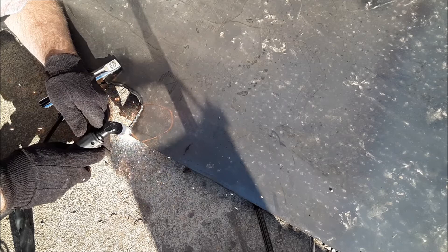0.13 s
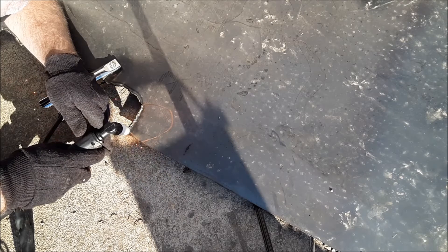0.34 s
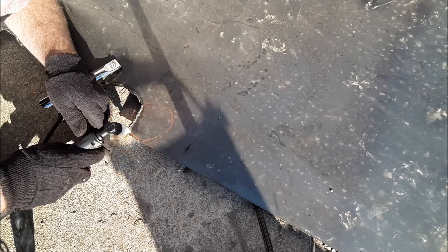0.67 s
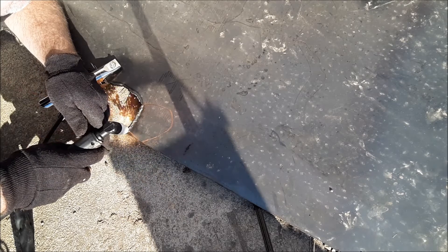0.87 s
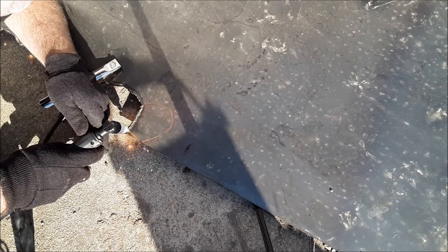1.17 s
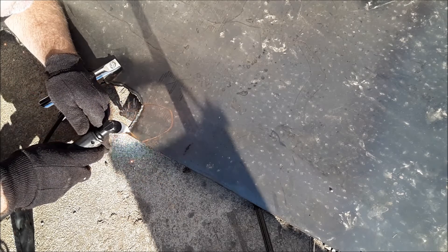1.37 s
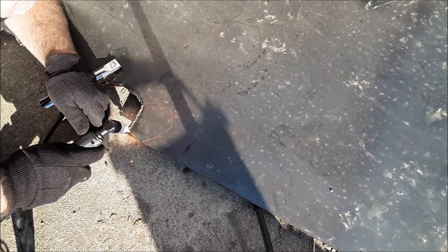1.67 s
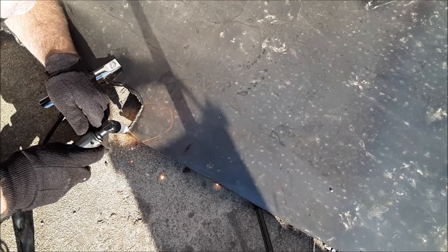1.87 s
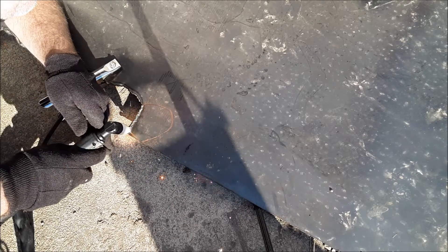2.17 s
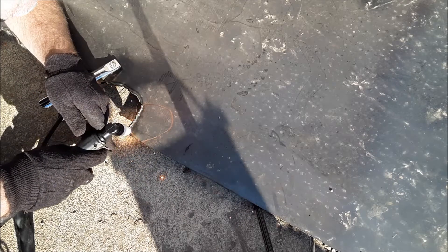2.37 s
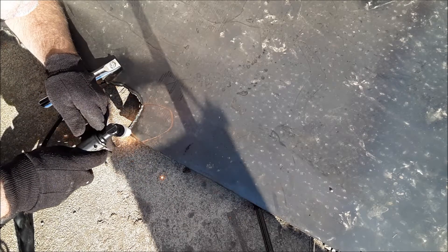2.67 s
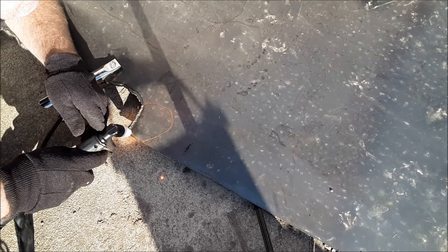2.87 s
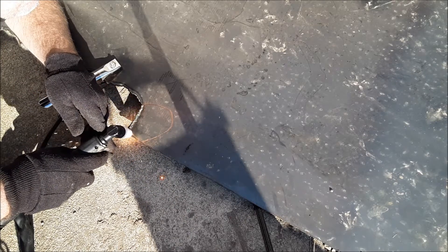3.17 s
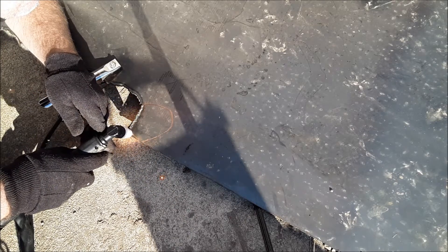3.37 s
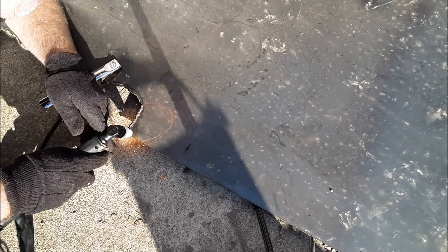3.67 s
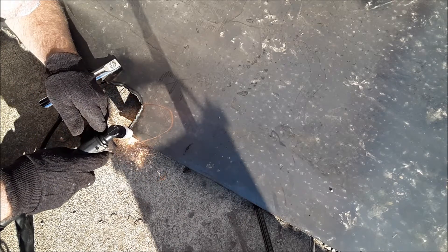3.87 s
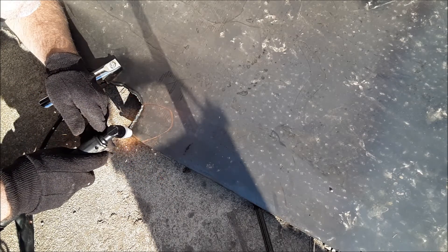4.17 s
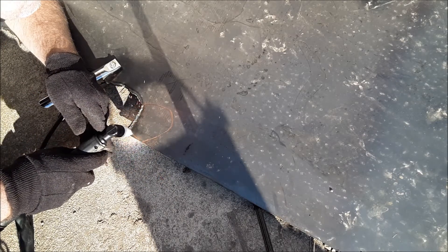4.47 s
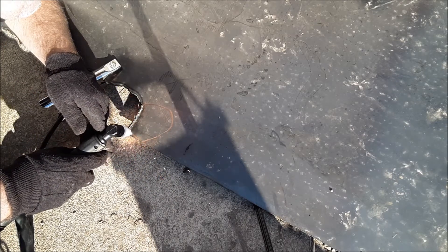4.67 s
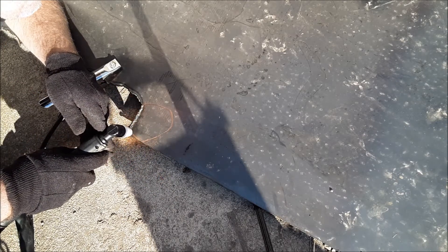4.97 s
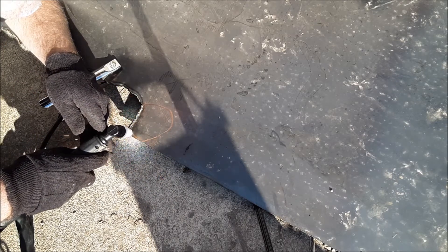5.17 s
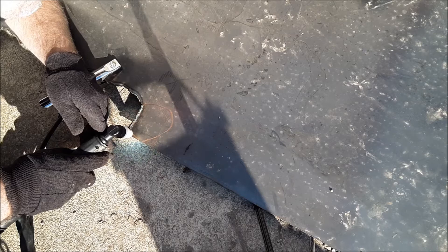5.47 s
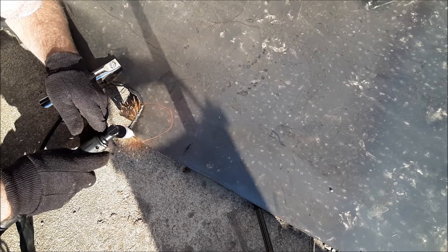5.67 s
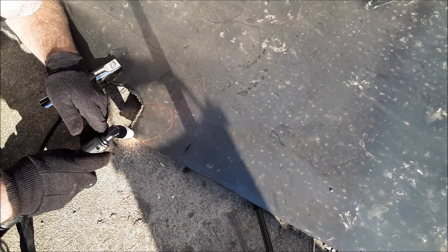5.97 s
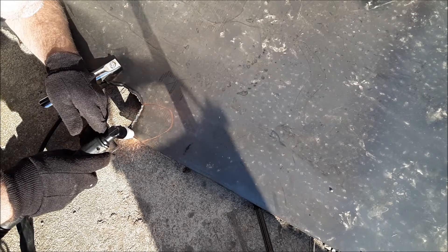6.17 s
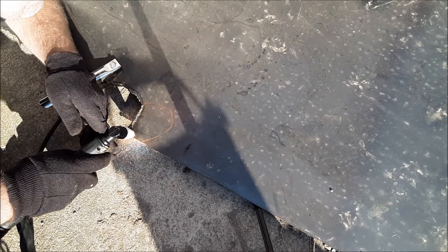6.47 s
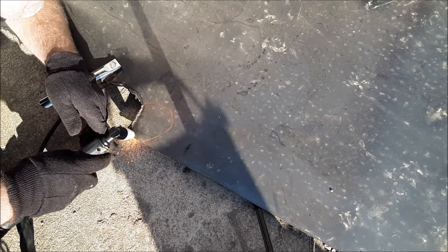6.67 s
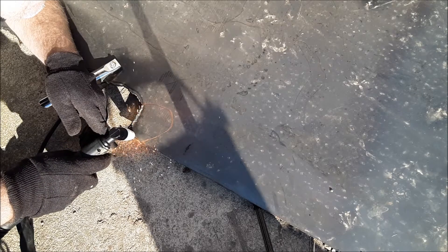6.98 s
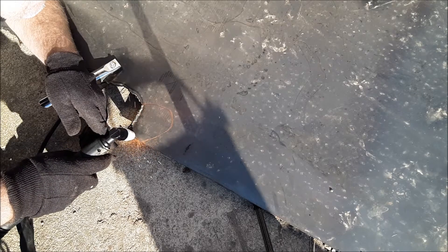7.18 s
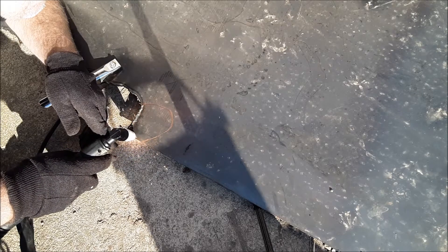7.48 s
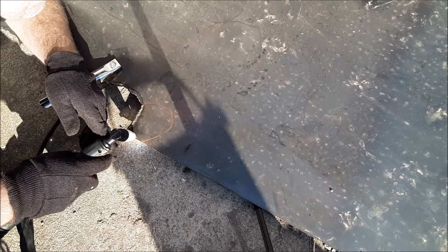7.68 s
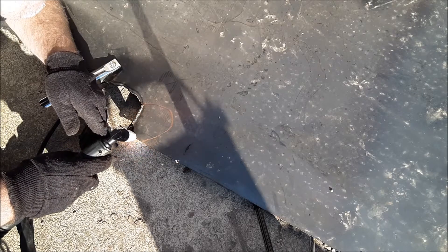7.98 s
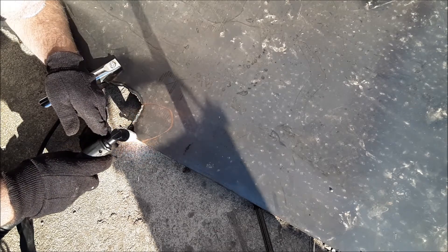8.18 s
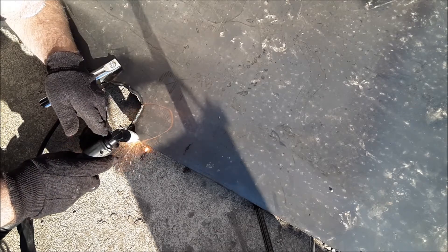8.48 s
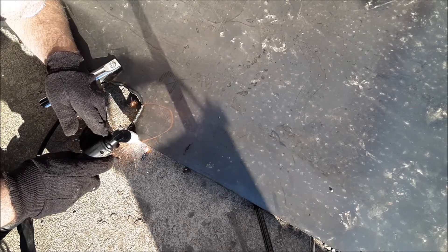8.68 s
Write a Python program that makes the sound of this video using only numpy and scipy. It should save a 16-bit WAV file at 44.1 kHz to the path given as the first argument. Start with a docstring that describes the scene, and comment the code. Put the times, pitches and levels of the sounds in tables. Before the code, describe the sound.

Close, bright hiss of compressed air with a crackling plasma arc that repeatedly snaps out and catches again, above a faint low rumble.

```python
"""A hand-held plasma torch cuts sheet steel outdoors, close to a small stereo camera.
The arc is four coloured noises: spit, sizzle, blast and roar. It pops when it breaks and flutters when it strikes
again, both made of short pressure pulses. Compressed air, a bright noise, hisses all the time.
Scattered sound and one faint short echo follow; the left microphone is nearer.
A low rumble and a light breeze, both soft noises, lie underneath."""
import sys
import numpy as np
from scipy import signal
from scipy.fft import rfft, irfft, next_fast_len
from scipy.io import wavfile
from scipy.ndimage import uniform_filter1d, map_coordinates

SR = 44100
rng = np.random.default_rng(int(sys.argv[2]) if len(sys.argv) > 2 else 0)


def waveform_to_disk(signal):
    """Save audio, clipped to [-1, 1], as 16-bit WAV at the path in sys.argv[1]."""
    frames = np.transpose(np.atleast_2d(signal))
    scaled = np.clip(frames, -1, 1) * 32767
    samples = np.round(scaled).astype(np.int16)
    wavfile.write(sys.argv[1], SR, samples)


N = 389403  # length in samples


def amp(db):
    """Turn decibels into a plain multiplier."""
    return 10 ** (np.asarray(db) / 20)


def unit(x):
    """Scale a signal to an average strength (rms) of 1."""
    return x / np.sqrt(np.mean(x ** 2) + 1e-20)


def seconds():
    """The time of every sample."""
    return np.arange(N) / SR


def along(points, hz):
    """Read a curve of (pitch_hz, value) points, spaced by ratio of pitch."""
    f, v = np.transpose(points)
    return np.interp(np.log(hz + 1), np.log(f + 1), v)


def filtered(x, response):
    """Change the strength and timing of each pitch in a sound."""
    m = next_fast_len(N + 8192)  # spare room so that tails do not wrap round
    hz = np.fft.rfftfreq(m, 1 / SR)
    return irfft(rfft(x, m) * response(hz), m)[..., :N]


def lifted(bands, hz):
    """Bell-shaped lifts and dips: (pitch_hz, width_hz, lift_db)."""
    return amp(sum(db * np.exp(-.5 * ((hz - centre) / width) ** 2) for centre, width, db in bands))


def wobble(rate):
    """A smooth random curve through `rate` random points a second."""
    knots = rng.standard_normal(int(N * rate / SR) + 4)
    return map_coordinates(knots, [np.arange(N) * rate / SR])


def turbulence(spectrum, patchy_db, gritty_db):
    """Rough flow: coloured noise with random patches in time and pitch, and a fast crackle."""
    z = signal.stft(rng.standard_normal(N), nperseg=512)[2]
    patches = uniform_filter1d(rng.standard_normal(z.shape), 7, 0)  # smooth over pitch
    patches = unit(uniform_filter1d(patches, 12, 1))  # smooth over time
    noise = signal.istft(z * amp(patchy_db * patches), nperseg=512)[1][:N]
    crackling = noise * amp(gritty_db * wobble(900))
    return unit(filtered(crackling, lambda hz: amp(along(spectrum, hz))))


def pulses(times, sizes, width_s):
    """Bell-shaped pressure pulses."""
    kicks = np.bincount(np.round(times * SR).astype(int), sizes, N)
    t = np.arange(-60, 61) / SR
    return np.convolve(kicks, np.exp(-.5 * (t / width_s) ** 2), "same")


# sudden changes of the arc: start_s, level_db (peak at the torch),
# direction (-1 inward as the arc collapses, 1 outward)
POP_EVENTS = [(.0422, -29, 1), (.2156, -22, -1), (.5146, -22, -1), (.8981, -18, -1), (1.198, -17, -1),
              (1.7808, -13, -1), (1.9562, -34, 1), (1.9676, -23, 1), (2.2, -27, 1), (3.5893, -20, -1),
              (4.2051, -15, -1), (4.3998, -33, 1), (4.4069, -30, 1), (4.8053, -17, -1), (5.169, -20, 1),
              (5.2461, -16, -1)]
# the arc strikes; each burn lasts until the next inward pop: start_s, catch_s (time to catch fully)
ARC_STRIKES = [(0.041, 0.0016), (0.393, 0.0036), (0.677, 0.014), (1.065, 0.01), (1.371, 0.02),
               (1.952, 0.012), (3.835, 0.023), (4.395, 0.0087), (5.163, 0.0045), (5.42, 0.063)]
# the burning arc: start_s, strength_db, lows_db (swing of the lower noises)
ARC_STRENGTH = [(.04, -36.5, -8.5), (.21, -39.5, 1.5), (.4, -37, -3), (.51, -37, -2), (.7, -36.5, 0),
                (.9, -35, 1.5), (1.4, -31, -1.5), (1.55, -32, 1), (1.72, -29.5, -5), (2.0, -32, -3.5),
                (2.17, -32.5, 4.5), (2.24, -33, 7.5), (2.28, -35.5, 0), (2.35, -38, 2), (2.45, -40.5, 3),
                (2.75, -47, 1.5), (3.1, -40, -2.5), (3.25, -46.5, 3), (3.45, -35, -1), (3.59, -33, 2.5),
                (3.85, -39.5, 3.5), (3.97, -34.5, 2), (4.2, -30.5, 1.5), (4.5, -31, 0), (4.8, -28.5, -1.5),
                (5.19, -32.5, 2), (5.25, -33, -1), (5.5, -38, 8), (5.69, -35.5, 5.5), (5.73, -33, -5),
                (5.82, -33.5, -4.5), (5.88, -34, 2), (6.1, -38, 1.5), (6.7, -33, -0.5), (7.05, -37, -4),
                (7.17, -34, -1), (7.6, -34, 1), (8.15, -34, -1), (8.4, -40, 3), (8.76, -30, -2.5),
                (8.83, -31.5, -0.5)]
# the arc falters without breaking: centre_s, depth_db (negative is a lift), half_length_s
ARC_FALTERS = [(2.09, 6.5, 0.016), (4.176, 1.5, 0.013), (4.418, 11, 0.011), (4.71, 6.5, 0.038),
               (6.34, -2, 0.016), (7.287, 10, 0.01), (7.44, -1, 0.035), (8.03, 9, 0.0049)]
# rows spit, sizzle, blast, roar: level_db (at middle strength), growth (dB per dB of strength),
# lows_share (share of lows_db), wander_db (own slow wander)
JET_NOISES = [(-34.5, 0.68, 0.12, 1), (-34.5, 0.73, 0, 0.08), (-42.5, 0.52, 0.62, 0), (-50, 0.9, 0.97, 2)]
# colours of the four noises: pitch_hz, relative_level_db
SPIT_COLOUR = [(150, -72), (400, -26.5), (9000, -37), (11000, -36), (12500, -2), (14000, -2), (15700, -3.5)]
SIZZLE_COLOUR = [(150, -58), (400, -19.5), (4500, -16), (6000, -5), (6500, -5.5), (8000, -6), (10000, 0.5),
                 (12000, -0.5), (14000, -41)]
BLAST_COLOUR = [(150, -63), (400, -21.5), (1200, -13), (1800, -2), (2500, -0.5), (3800, -2), (5500, -3),
                (7500, -72)]
ROAR_COLOUR = [(30, -58), (110, -34), (150, -2.5), (210, -3), (400, -2), (700, 1.5), (1100, 3.5),
               (1600, 0.5), (2400, -13.5), (4000, -53)]
MIDDLE_DB = -35  # the strength at which the four noises have their listed levels
FLARE_DB, FLARE_S = 0.5, 0.036  # the arc stretches and brightens just before it breaks
SURGE_DB, SURGE_S = 1.5, 0.03  # the current overshoots after a strike


def burning():
    """The arc's on-off gain: it catches at each strike and stops at the next break."""
    t = seconds()
    breaks = [at for at, db, direction in POP_EVENTS if direction < 0]
    on = np.zeros(N)
    for (strike, catch), end in zip(ARC_STRIKES, breaks + [np.inf]):  # the last burn does not break
        lit = (t >= strike) & (t < end)
        flare_db = FLARE_DB * np.exp(-np.abs(end - t) / FLARE_S)
        surge_db = SURGE_DB * np.exp(-np.abs(t - strike) / SURGE_S)
        on += lit * amp(flare_db + surge_db) * np.clip((t - strike) / catch, 0, 1)
    return on


def arc():
    """Four noises of the hot jet, switched on and off with the current."""
    t = seconds()
    s, strength_db, lows_db = np.transpose(ARC_STRENGTH)
    strength = np.interp(t, s, strength_db) - MIDDLE_DB
    lows = np.interp(t, s, lows_db)
    for at, depth_db, half in ARC_FALTERS:
        strength -= depth_db * np.exp(-.5 * ((t - at) / half) ** 2)
    levels_db = np.array([db + growth * strength + share * lows + wander_db * wobble(9)
                          for db, growth, share, wander_db in JET_NOISES])
    gains = uniform_filter1d(burning() * amp(levels_db), size=40)  # soften the switching
    sputter = 0.08 * wobble(18) + 0.55 * wobble(45)  # dB; molten steel leaves the cut unevenly
    spit, sizzle, blast, roar = gains * amp(sputter)
    return (spit * turbulence(SPIT_COLOUR, patchy_db=.8, gritty_db=1.3)
            + sizzle * turbulence(SIZZLE_COLOUR, patchy_db=.8, gritty_db=1.4)
            + blast * turbulence(BLAST_COLOUR, patchy_db=1.8, gritty_db=1.2)
            + roar * turbulence(ROAR_COLOUR, patchy_db=1.2, gritty_db=2.5))


def pops():
    """Each sudden change of the arc's volume is one short pressure pulse."""
    s, db, direction = np.transpose(POP_EVENTS)
    return pulses(s, direction * amp(db), width_s=.0001)


# the freshly struck arc jumps to and fro: start_s, length_s, rate_per_s (jumps),
# level_db (middle peak at the torch)
FLUTTER_TRAINS = [(0.042, 0.018, 680, -39.5), (0.395, 0.015, 440, -36.5), (0.686, 0.047, 460, -29.5),
                  (1.073, 0.036, 405, -30.5), (1.371, 0.017, 600, -28.5), (1.96, 0.014, 520, -30.5),
                  (3.837, 0.015, 570, -40.5), (5.159, 0.018, 500, -36)]
SNAP_SHARE, SNAP_DB = .3, -4.5  # share of jumps that snap sharply; snap level against its jump


def flutter():
    """Uneven trains of softer pulses that swell in over the first jumps; some of them snap."""
    out = np.zeros(N)
    for start, length, rate, db in FLUTTER_TRAINS:
        gap_chance, size_chance = rng.standard_normal((2, 40))
        snaps = rng.random(40) < SNAP_SHARE
        times = np.cumsum(np.abs(1 + 0.21 * gap_chance)) / rate
        swell = np.clip(times / 0.0086, 0, 1)
        sizes = -swell * (times < length) * amp(db + 2.9 * size_chance)
        out += pulses(start + times, sizes, width_s=0.00017)
        out += pulses(start + times, snaps * amp(SNAP_DB) * sizes, width_s=0.00007)
    return out


# air flow from the nozzle: start_s, level_db (at the torch, before a slight wobble)
AIR_FLOW = [(0, -41), (.3, -42.5), (.6, -41.5), (1, -37.5), (1.3, -39), (1.87, -38.5), (3.7, -38),
            (4.3, -35.5), (5, -37), (5.33, -37), (8.83, -37.5)]
# colour of the hiss: pitch_hz, relative_level_db
HISS_COLOUR = [(100, -70), (400, -37), (1000, -9.5), (1500, -4), (2000, 1.5), (3000, 1.5), (4000, 4),
               (5500, 6), (9000, 3), (10000, 7.5), (11500, 7.5), (13000, 6.5), (15700, 6.5)]


def air():
    """The cold jet is a bright hiss that keeps blowing between burns."""
    level_db = np.interp(seconds(), *np.transpose(AIR_FLOW)) + .6 * wobble(20)
    return amp(level_db) * turbulence(HISS_COLOUR, patchy_db=.8, gritty_db=.8)


# sound bends round the camera body, so the right side's lag depends on pitch: pitch_hz, lag_us (microseconds)
RIGHT_LAG = [(700, 117), (1050, 108), (1400, 132), (2050, 120), (2750, 141), (4800, 144), (5900, 138),
             (6900, 127), (8300, 119), (9600, 134), (15000, 135)]


def two_sides(torch):
    """Sound reaches the right microphone a little later than the left."""
    def lag(hz):
        cycles = hz * along(RIGHT_LAG, hz) / 1e6
        return np.exp(-2j * np.pi * np.outer([0, 1], cycles))
    return filtered(torch, lag)


# scattered sound: pitch_hz, level_db (against the direct sound), t60_s (time to fade by 60 dB)
SCATTERED = [(100, -8, .08), (600, -6.5, .08), (1500, -4.5, .06), (3000, -3, .03), (6000, -.5, .015),
             (9000, -2.5, .015), (15000, -2.5, .015)]


def surroundings(x):
    """Scattered sound: fresh noise on each side follows the torch's fading power at each pitch."""
    hz, t, z = signal.stft(x, SR, nperseg=128)
    table = np.array(SCATTERED)
    level_db = along(table[:, [0, 1]], hz)[:, None]
    t60 = along(table[:, [0, 2]], hz)[:, None]
    decay = amp(-60 * np.arange(40) * t[1] / np.abs(t60))
    decay = amp(level_db) * decay / np.linalg.norm(decay, axis=1, keepdims=True)
    power = np.abs(signal.fftconvolve(np.abs(z) ** 2, decay ** 2, axes=1)[:, :len(t)])
    power = uniform_filter1d(power, size=3, axis=1, origin=1)
    # fresh noise, as the flickering jet never takes the same paths twice
    noise = signal.stft(rng.standard_normal((2, N)), SR, nperseg=128)[2]
    noise /= np.sqrt(np.mean(np.abs(noise) ** 2))
    wet = signal.istft(np.sqrt(power) * noise, SR, nperseg=128)[1][:, :N]
    return filtered(wet, lambda hz: hz ** 3 / (hz ** 3 + 170 ** 3))  # keep deep bass out of the scattered sound


# reflections from hand, clamp and sheet as the torch travels: start_s, end_s, left bands, right bands;
# each band: pitch_hz, width_hz, lift_db
TORCH_PLACES = [(0, .9, [(4000, 250, 3.5), (4700, 400, -2), (5850, 200, -3.5), (6900, 450, 2.5),
                (7900, 300, 1.5), (9200, 350, 4), (10800, 600, -3), (12700, 600, 2.5), (13900, 200, -3),
                (15400, 350, 3)], [(3800, 400, 2.5), (4900, 600, -3), (7600, 300, 1.5), (8900, 250, 3),
                (10400, 700, -4), (12500, 500, 3.5), (15300, 400, 4.5)]), (1.4, 2.1, [(3900, 400, 4),
                (5850, 220, -4.5), (6600, 300, 4), (7900, 300, 4), (9700, 500, 3), (11300, 400, -4.5),
                (12500, 400, 2), (13450, 200, 5), (14100, 300, 2.5), (15350, 350, 5.5)], [(3800, 600, 3.5),
                (5700, 350, -3.5), (6500, 400, 2), (8000, 400, 5), (9900, 500, 2), (11200, 400, -4),
                (12500, 250, 2.5), (13400, 200, 4.5), (15250, 350, 6)]), (2.5, 3.4, [(4000, 300, 3.5),
                (5700, 350, -2), (6900, 450, 3.5), (7900, 300, 3), (9600, 400, 3.5), (12600, 450, 5),
                (14200, 500, -1.5), (15400, 350, 2.5)], [(4000, 600, 2.5), (5300, 600, -2.5),
                (8200, 500, 3), (9500, 300, 1.5), (12600, 400, 4.5), (15200, 400, 2.5)]),
                (3.9, 4.8, [(3700, 500, 3.5), (5600, 250, -2.5), (8700, 250, 4.5), (10000, 300, 1.5),
                (10700, 300, -2), (11650, 200, -2.5), (12550, 300, 3.5), (14100, 250, 2.5),
                (15400, 300, 3.5)], [(3600, 450, 3.5), (5300, 450, -2), (8400, 400, 4.5),
                (10300, 700, -1.5), (12300, 400, 3), (14100, 400, 1), (15400, 300, 3.5)]),
                (5, 5.3, [(3800, 400, 2.5), (5500, 250, -1.5), (7100, 450, 3), (8900, 300, 1.5),
                (11100, 300, -2.5), (12900, 500, 3), (15300, 400, 3)], [(3800, 500, 2.5), (5200, 500, -1.5),
                (7900, 400, 3), (10500, 600, -1.5), (12500, 600, 2.5), (15000, 600, 2.5)]),
                (5.5, 5.7, [(3600, 400, 2), (7300, 400, 2.5), (8500, 300, 1.5), (10100, 200, 1),
                (11100, 150, 3), (12300, 250, 4), (13300, 200, 1), (14700, 300, -2), (15500, 200, 4)],
                [(3500, 400, 2.5), (8300, 400, 3), (10700, 200, 1), (12150, 250, 4.5), (14000, 300, 2),
                (15400, 300, 2)]), (5.95, 6.4, [(3600, 400, 2), (7700, 500, 2.5), (9200, 200, -3),
                (10100, 200, 2), (11200, 300, -2), (11950, 200, 3.5), (13300, 150, 4), (14150, 150, 2),
                (14900, 200, 4), (15500, 150, 3)], [(3500, 400, 2.5), (8200, 350, 4), (9000, 200, -2),
                (10100, 200, 1.5), (11850, 250, 4.5), (13100, 250, 3), (14000, 200, 1.5),
                (14900, 400, 2.5)]), (6.8, 7.5, [(3600, 400, 2), (5700, 300, -1.5), (7300, 300, 2.5),
                (8600, 170, 3.5), (10150, 200, 2.5), (11200, 300, -2.5), (11900, 200, 3.5),
                (12700, 200, -1), (13350, 150, 5), (14150, 150, 3), (15100, 350, -.5)], [(3500, 400, 2.5),
                (8200, 450, 4), (9100, 200, -2), (10000, 250, 1.5), (11200, 250, -2), (11900, 300, 4),
                (13250, 200, 3), (14100, 250, 2), (15300, 400, .5)]), (7.8, 8.3, [(3000, 200, 1.5),
                (5700, 300, -2.5), (7100, 400, 2), (8200, 350, 4.5), (9900, 250, 2.5), (10700, 300, -2),
                (11600, 300, 3.5), (12400, 200, -2.5), (13300, 200, 2.5), (14200, 250, 2.5),
                (15200, 300, -2)], [(3300, 300, 2), (5900, 300, -2), (8000, 400, 5.5), (8800, 250, -2),
                (9800, 250, 2.5), (10500, 200, -3), (11500, 400, 4), (13200, 200, 2), (14000, 300, 2),
                (15000, 300, -2)]), (8.55, 8.83, [(5700, 300, -2.5), (7900, 400, 2), (9100, 200, 4),
                (9800, 200, 1), (11300, 250, 3.5), (13600, 250, 4), (15500, 200, 2.5)], [(5700, 300, -2.5),
                (8000, 400, 3), (9500, 250, 2.5), (10900, 350, 3.5), (12200, 250, 2), (13800, 400, 2.5),
                (15400, 300, 2)])]
# lifts and dips that stay put, left list then right list: pitch_hz, width_hz, lift_db
STEADY_BANDS = [
    [(234, 50, 4), (407, 33, 4.5), (580, 99, 3.5), (742, 33, -5.5), (855, 40, 2.5), (960, 50, 3),
     (1150, 110, -2.5), (1394, 27, 4.5), (1600, 42, -4), (1880, 100, 3.5), (2350, 99, -4), (2780, 44, 2.5),
     (2700, 22, 0.5), (3000, 24, -6), (3070, 63, 6), (3220, 45, -6), (3840, 40, -7), (4000, 58, 2),
     (4170, 60, -7.5), (4180, 38, 1.5), (4300, 77, 2)],
    [(230, 50, 2), (405, 33, 3), (590, 140, 2), (806, 30, -6.5), (980, 80, 2), (1117, 35, -10.5),
     (1385, 16, 2.5), (1710, 40, 1.5), (1790, 25, -9.5), (1940, 80, 3), (2360, 150, -2), (3080, 40, 5.5),
     (3200, 40, 0.5), (3430, 80, 1), (3440, 33, -6), (4150, 54, 1), (4150, 50, -5.5), (4500, 78, 2),
     (4520, 59, 2)],
]
# one faint short echo, mostly on the right: delay_ms, left_db, right_db (against the sound before the echo)
FAINT_ECHO = (3.02, -34, -22)


def paths(pair):
    """Reflections colour the sound, drifting as the torch travels; one faint short echo is added."""
    times = np.ravel([place[:2] for place in TORCH_PLACES])
    drifting = np.zeros((2, N))
    for share, (start, end, left, right) in zip(np.eye(len(TORCH_PLACES)), TORCH_PLACES):
        fade = np.interp(seconds(), times, np.repeat(share, 2))  # full at this place, fading to its neighbours
        drifting += fade * filtered(pair, lambda hz: np.array([lifted(left, hz), lifted(right, hz)]))
    delay_ms, *echo_db = FAINT_ECHO

    def steady(hz):
        echo = 1 + np.outer(amp(echo_db), np.exp(-2j * np.pi * hz * delay_ms / 1000))
        return echo * [lifted(side, hz) for side in STEADY_BANDS]
    return filtered(drifting, steady)


# colour of the rumble: pitch_hz, relative_level_db
RUMBLE_COLOUR = [(30, -45), (140, -14), (210, -0.5), (300, 4), (450, -2.5), (800, -8), (1500, -27),
                 (3000, -16)]
# the rumble grows at first: start_s, change_db
RUMBLE_SWELL = [(0, -3.5), (2, -1), (3.6, 0), (8.83, -1)]


def yard():
    """A low rumble, probably the compressor: noise partly shared by both sides."""
    shared = turbulence(RUMBLE_COLOUR, patchy_db=2.5, gritty_db=4.0)
    own = np.array([turbulence(RUMBLE_COLOUR, patchy_db=3.0, gritty_db=2.5) for _ in "LR"])
    swell_db = np.interp(seconds(), *np.transpose(RUMBLE_SWELL))
    return amp(swell_db + [[-57.5], [-59.5]]) * (shared + 1.01 * own)


def capsule(hz):
    """The microphones cut the bass of airborne sound."""
    low_hz, damping = 270, 2.1
    deep_hz = 70  # a further cut of the deepest bass
    bass_cut = -hz ** 2 / (low_hz ** 2 - hz ** 2 + 1j * damping * hz * low_hz)
    deep_cut = 1j * hz / (deep_hz + 1j * hz)
    return bass_cut * deep_cut


# puffs of breeze: peak_s, level_db (before the random wobbles)
BREEZE_PUFFS = [(.55, -83), (.78, -85), (.95, -78), (1.25, -83), (1.45, -72.5), (2.2, -66.5), (2.55, -80),
                (3.2, -79), (3.45, -79), (3.9, -80), (4.4, -76), (4.55, -74), (5.5, -81), (5.85, -80),
                (6.28, -72), (6.75, -80), (6.95, -81), (7.25, -74), (7.45, -78), (8.05, -77), (8.6, -72)]
# colour of the breeze: pitch_hz, relative_level_db
BREEZE_COLOUR = [(25, -23.5), (50, -21), (100, -5), (150, 3), (200, -19), (500, -48)]
CALM_DB, PUFF_RISE_DB_PER_S, PUFF_FALL_DB_PER_S = -92, 150, 110  # level between puffs; slopes of a puff


def breeze():
    """Faint puffs of air on the microphone ports: low noise, different on each side."""
    t = seconds()
    puffs = [db - np.where(t < s, PUFF_RISE_DB_PER_S, PUFF_FALL_DB_PER_S) * np.abs(t - s)
             for s, db in BREEZE_PUFFS]
    level_db = np.maximum(np.max(puffs, axis=0), CALM_DB) + 3 * wobble(6.6)
    return np.array([amp(level_db + 4 * wobble(12)) * turbulence(BREEZE_COLOUR, patchy_db=3, gritty_db=3)
                     for _ in "LR"])


def scene():
    """Torch, echoes and background at two microphones."""
    torch = arc() + pops() + flutter() + air()
    arriving = paths(two_sides(torch) + surroundings(torch))
    near = amp([[-1.4], [-2.7]]) * arriving  # left and right levels
    return filtered(near + yard(), capsule) + breeze()  # the breeze blows straight on the ports


def record(dry):
    """Nothing is kept above the band limit."""
    top_hz = 15750
    return filtered(dry, lambda hz: hz < top_hz)


dry = scene()
out = record(dry)
waveform_to_disk(out)
```